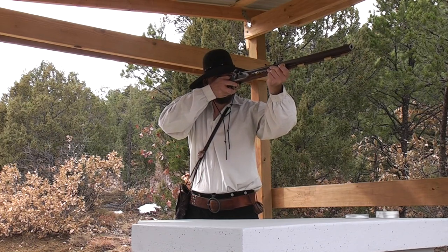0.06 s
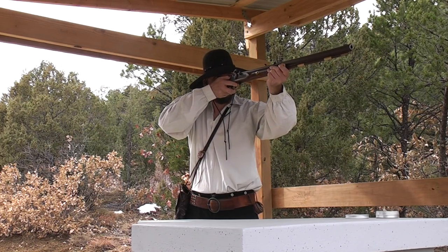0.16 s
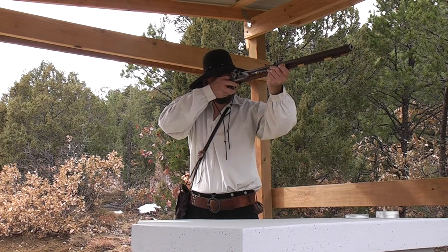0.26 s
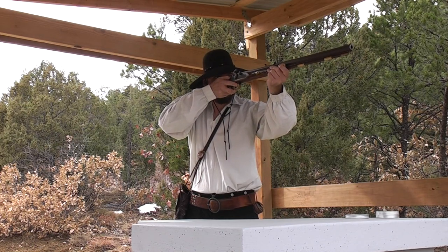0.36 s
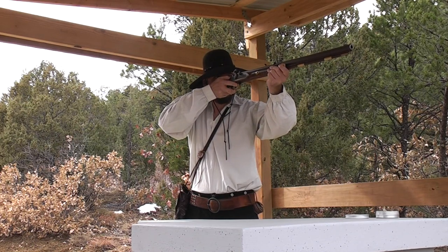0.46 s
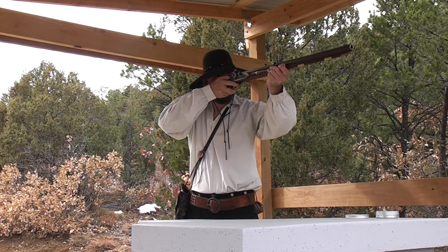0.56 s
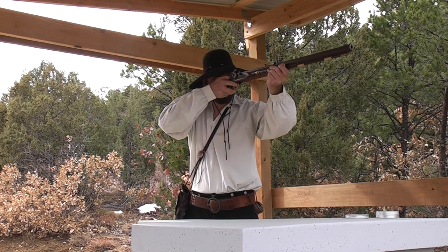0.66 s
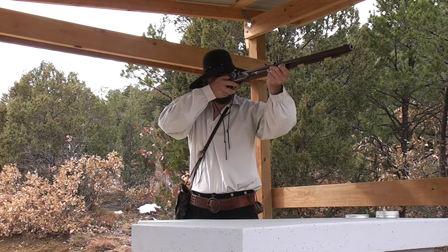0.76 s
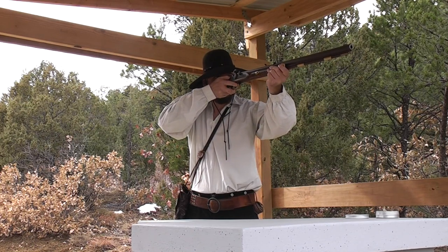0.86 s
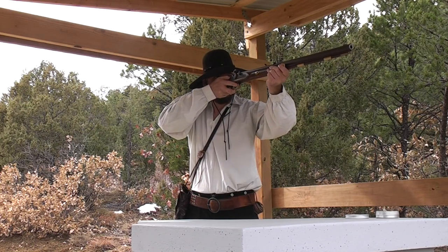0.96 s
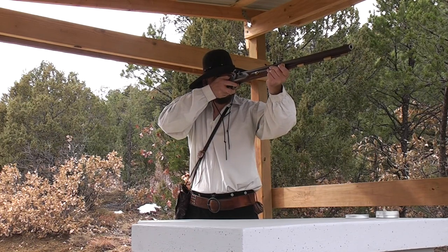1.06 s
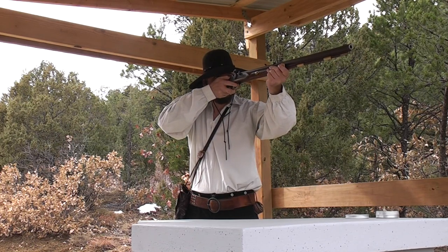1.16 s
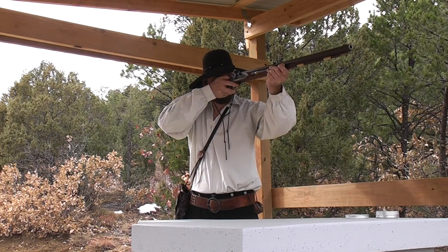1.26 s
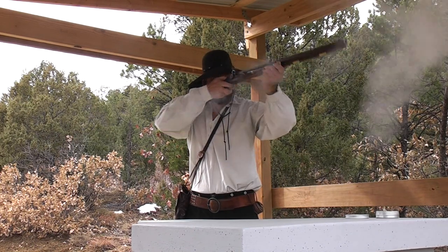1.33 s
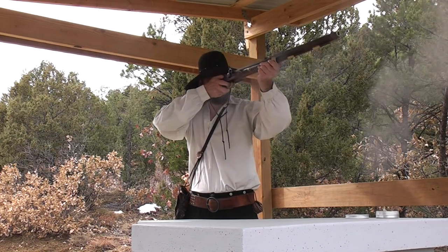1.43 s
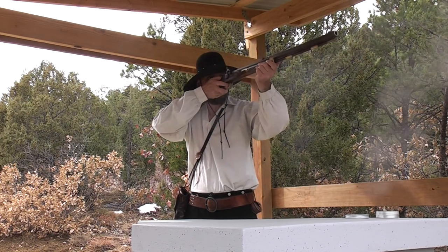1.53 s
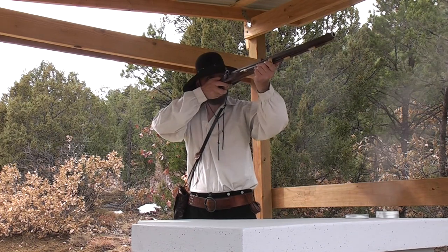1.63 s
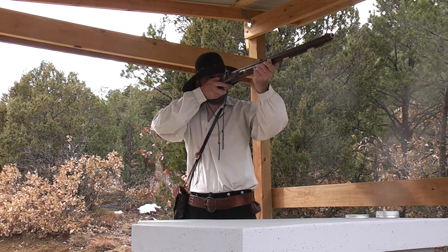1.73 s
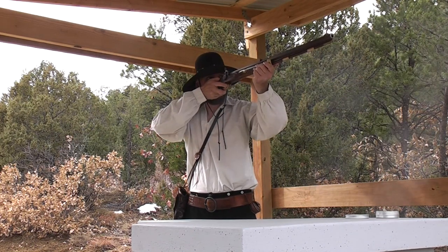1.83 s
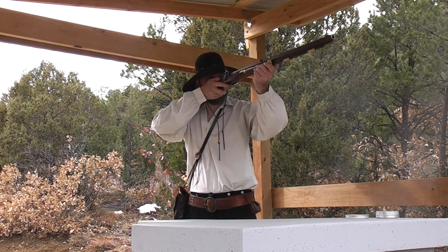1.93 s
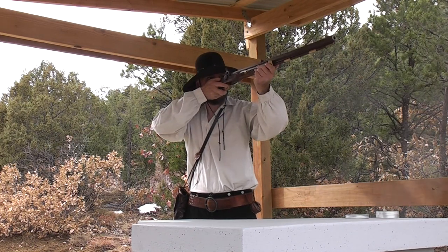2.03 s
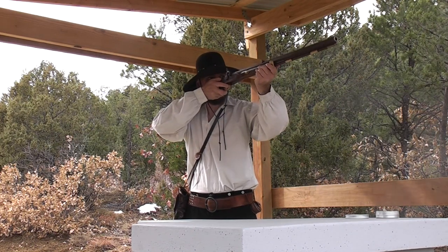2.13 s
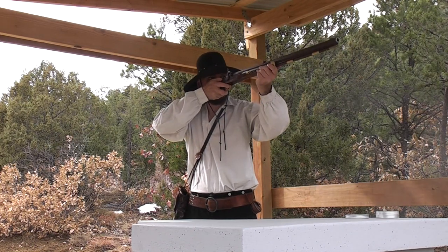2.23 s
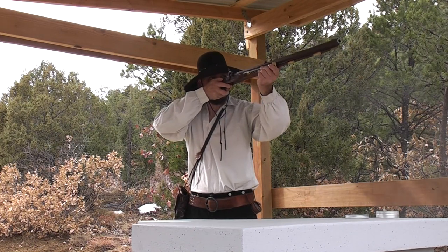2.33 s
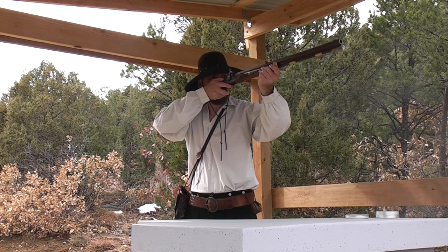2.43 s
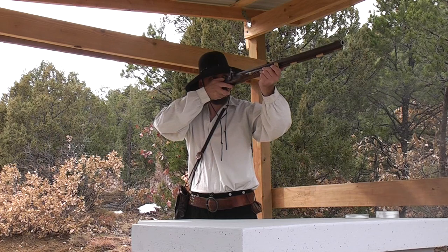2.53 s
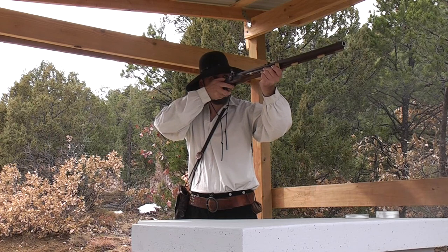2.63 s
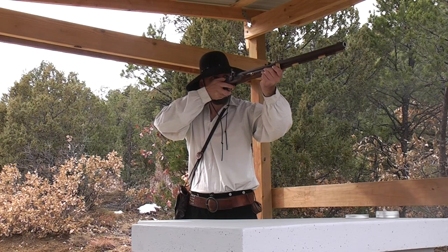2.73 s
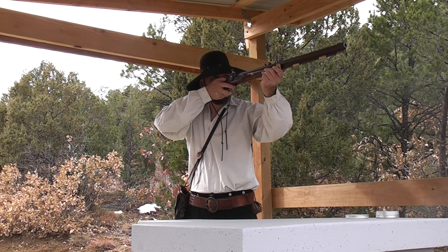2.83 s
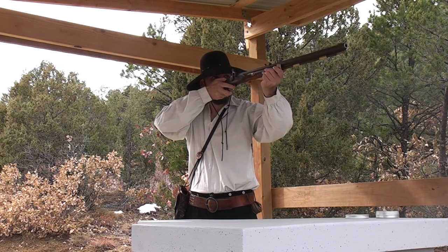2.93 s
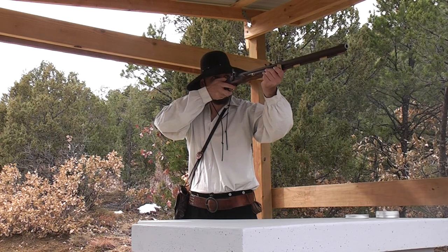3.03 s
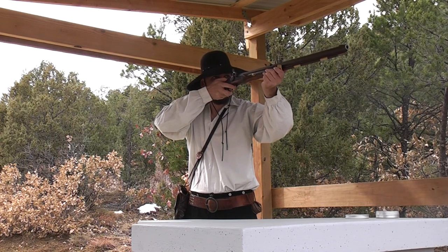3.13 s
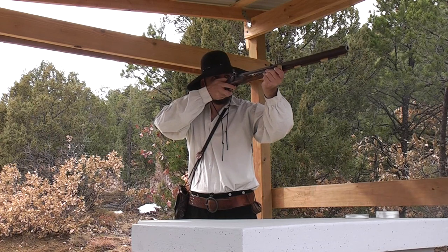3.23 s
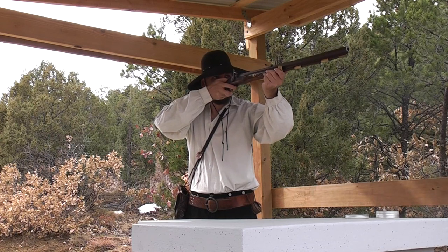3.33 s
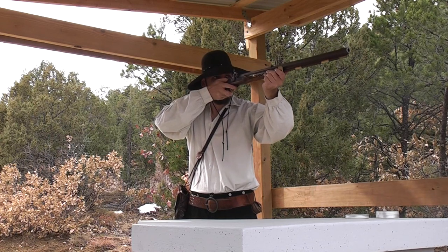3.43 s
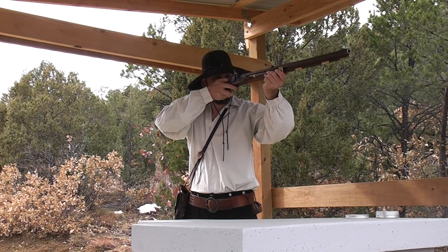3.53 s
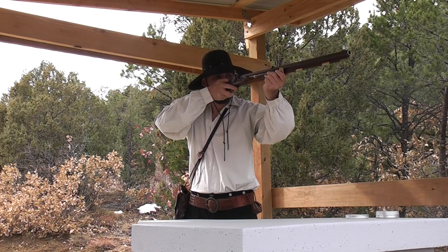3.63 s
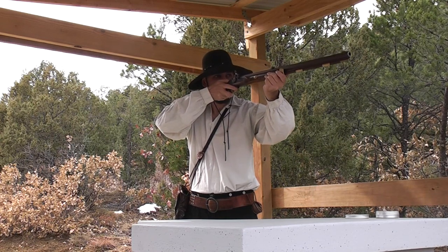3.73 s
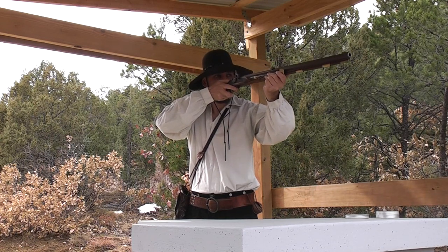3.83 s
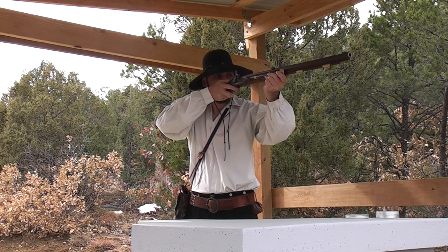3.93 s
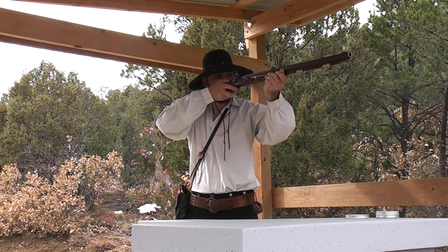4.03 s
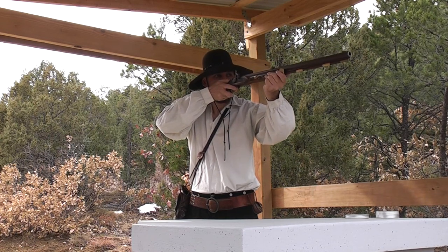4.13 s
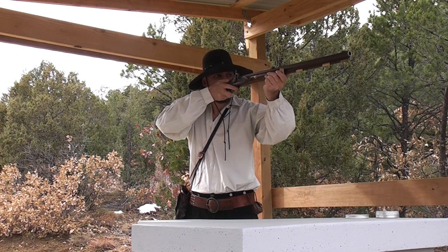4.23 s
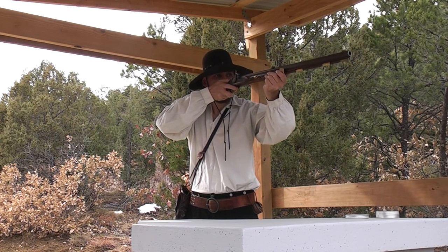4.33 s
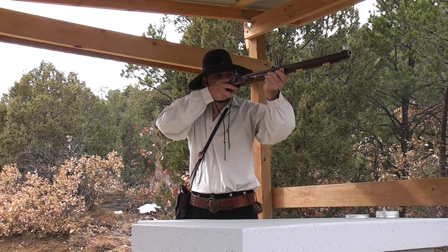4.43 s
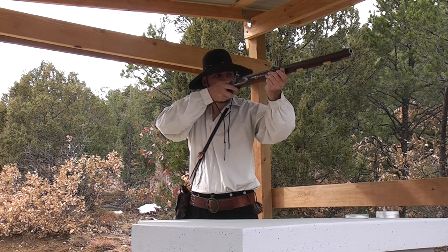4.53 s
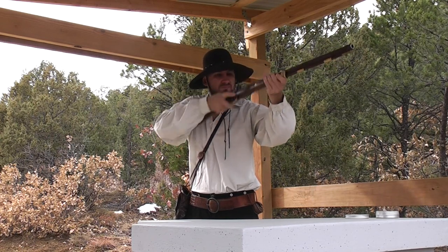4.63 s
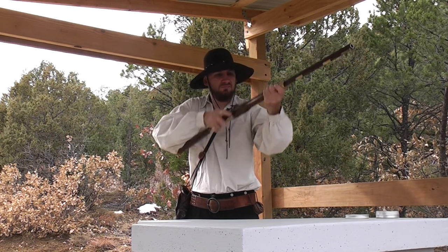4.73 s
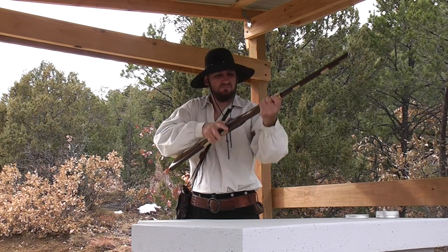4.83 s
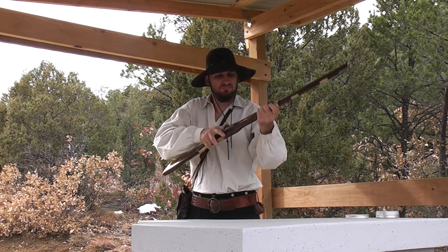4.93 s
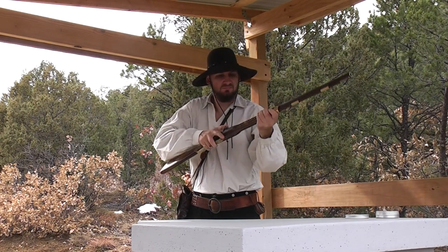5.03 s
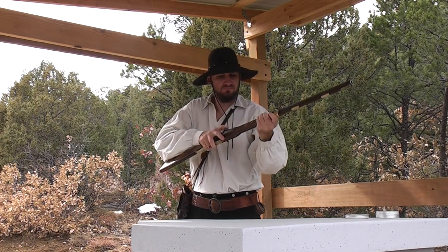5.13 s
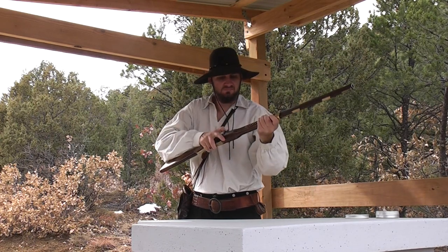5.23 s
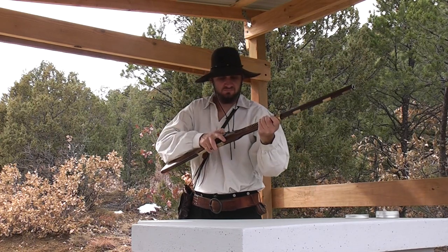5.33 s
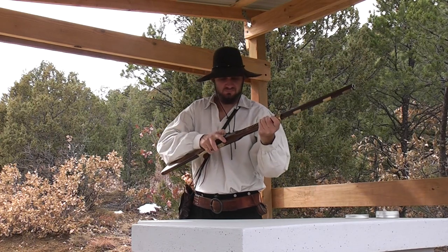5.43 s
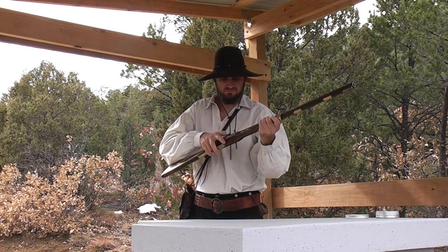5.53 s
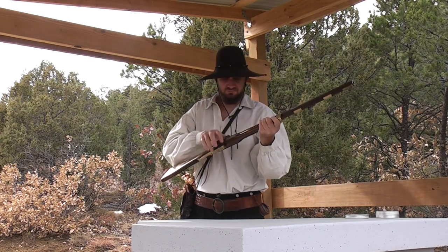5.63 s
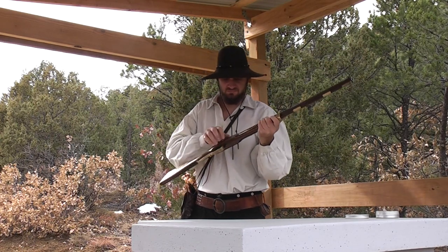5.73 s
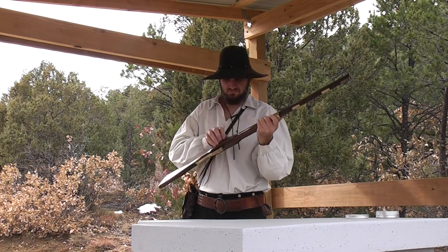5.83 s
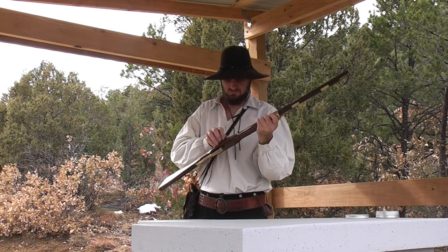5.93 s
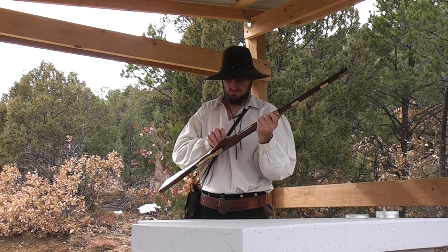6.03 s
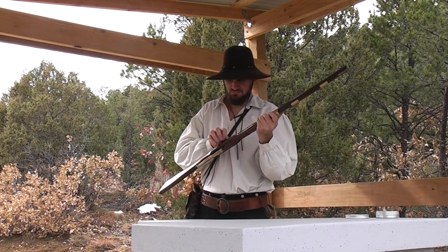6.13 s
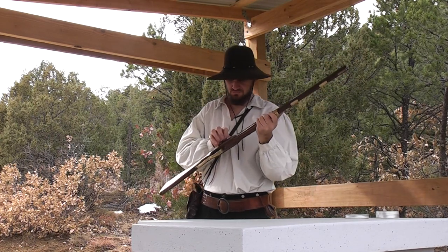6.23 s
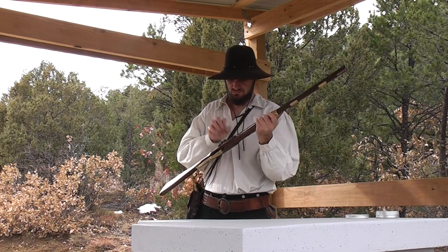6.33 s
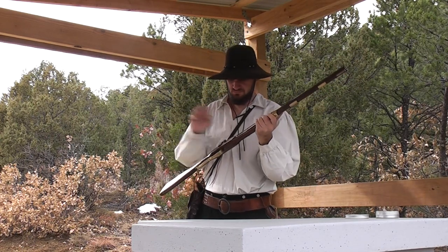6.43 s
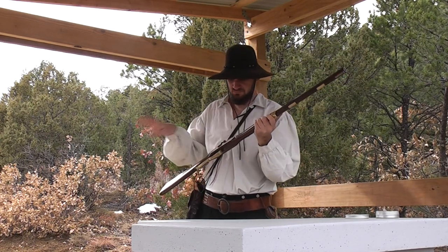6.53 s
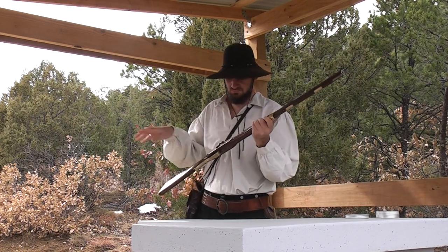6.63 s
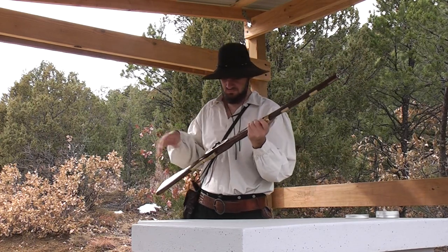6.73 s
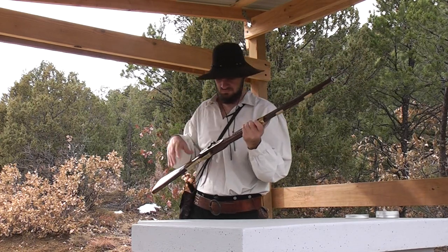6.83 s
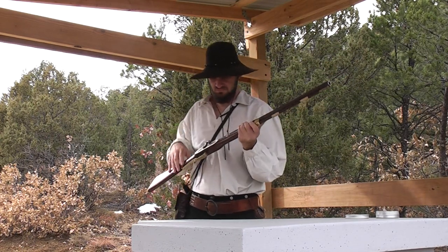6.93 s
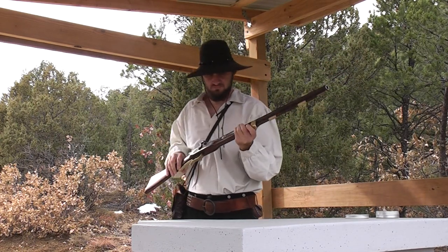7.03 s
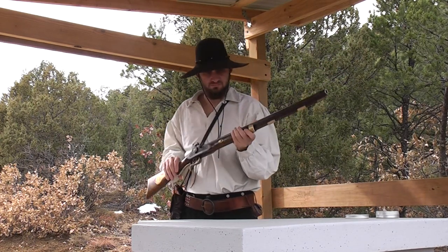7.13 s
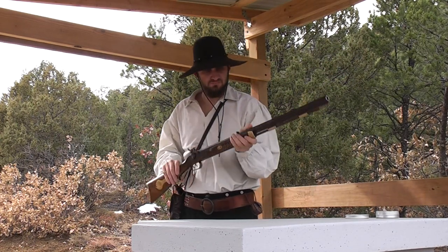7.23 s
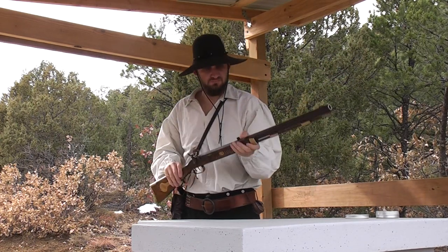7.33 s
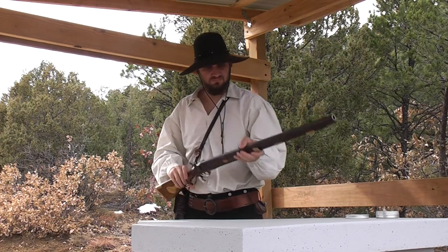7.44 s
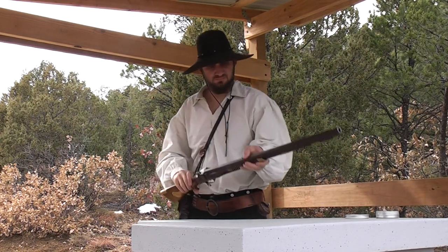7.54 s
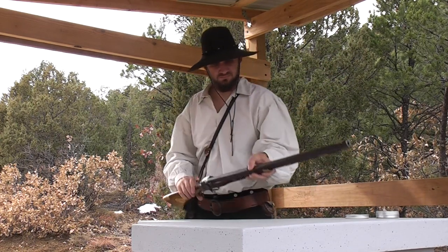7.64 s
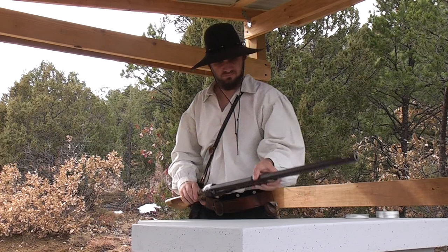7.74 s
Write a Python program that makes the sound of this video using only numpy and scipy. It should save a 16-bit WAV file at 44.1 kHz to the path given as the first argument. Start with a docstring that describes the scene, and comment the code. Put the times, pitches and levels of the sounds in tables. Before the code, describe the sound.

A black powder rifle cracks and booms under a timber shelter, echoes rolling off wooded hills, then sharp lock clicks and handling rubs.

```python
"""Hiss and a faint camera purr, soft pats on a gunstock, then a black powder rifle fired under a timber shelter.
The cap cracks, the blast (shaped noise) overloads the microphone, the air under the roof booms (dying sines).
Trees and hills return the shot ever duller: hard echoes over a wash of scattered noise.
Then the lock is cocked and the gun shifted in the hands: short noise scrapes and rubs that ring steel and wood."""
import sys
import numpy as np
from scipy import signal
from scipy.fft import rfft, irfft
from scipy.io import wavfile
from scipy.ndimage import uniform_filter1d

SR = 44100
rng = np.random.default_rng(int(sys.argv[2]) if len(sys.argv) > 2 else 0)


def bounce(signal):
    """Save signal as a 16-bit WAV file at the path given by the first command-line argument."""
    frames = np.transpose(np.atleast_2d(signal))
    limited = np.clip(frames, -1, 1)
    pcm = np.round(limited * 32767).astype(np.int16)
    wavfile.write(sys.argv[1], SR, pcm)


N = 342827
T = np.arange(N) / SR

CAP_S, BLAST_S, BOOM_S = 1.3977, 1.4057, 1.44  # onsets


def amp(db):
    """Decibels to gain."""
    return 10 ** (np.asarray(db) / 20)


def unit(x):
    """Scales to rms 1."""
    return x / np.sqrt(np.mean(x ** 2) + 1e-20)


def read(points, hz):
    """Interpolates a (Hz, value) table on a log-frequency axis."""
    f, value = np.transpose(points)
    return np.interp(np.log(hz + 1), np.log(f + 1), value)


def add(mix, start_s, sound):
    """Mixes a sound in at start_s, cut at the end of the mix."""
    part = mix[..., round(start_s * SR):][..., :sound.shape[-1]]
    part += sound[..., :part.shape[-1]]


def bins(size=4096):
    """Frequencies in Hz at which colours are given."""
    return np.fft.rfftfreq(size, 1 / SR)


def colour(x, db):
    """Minimum-phase filter of unit energy; db sets the shape of its response, one value per bin."""
    log_gain = np.log(amp(np.maximum(db - db.max(), -100)))
    mirrored = np.r_[log_gain, log_gain[-2:0:-1]]
    response = np.exp(np.conj(signal.hilbert(mirrored)))
    taps = np.fft.ifft(response).real[:len(db)]
    return signal.oaconvolve(x, taps / np.linalg.norm(taps))[:len(x)]


def spread(mid, side):
    """Left and right from mid and side."""
    return np.array([mid + side, mid - side])


def ring(modes, size=12000):
    """Dying sines of a resonance; modes are (Hz, dB, t60 in s)."""
    t = T[:size]
    return sum(amp(db - 60 * t / t60_s) * np.sin(2 * np.pi * hz * t) for hz, db, t60_s in modes)


def hump(centre_hz, steep_db):
    """A broad peak in dB that falls with the square of the distance in octaves."""
    return -steep_db * np.log2((bins() + 1) / centre_hz) ** 2


def shelter(x, wet_db, t60_s, size=10000):
    """Dense reflections from roof, posts and bench, a little different left and right."""
    t = T[:size]
    onset = np.clip((t - 0.002) / 0.0016, 0, 1)
    taps = rng.standard_normal((2, size)) * amp(-60 * t / t60_s) * onset
    taps = spread(taps[0], 0.5 * taps[1]) / np.linalg.norm(taps[0])
    return x + amp(wet_db) * signal.oaconvolve(x[None], taps, axes=1)[:, :N]


def background(floor_db=-62.5, purr_db=-50.5, turn_hz=29.42, size=1400):
    """Still air and microphone hiss; the camera's motor gives a soft knock of uneven strength at each turn."""
    # Spectrum of the hiss. Each row: frequency in Hz, level in dB.
    floor_spectrum = [(15, -66), (25, -38), (48, -11.5), (85, -20.5), (119, -10.5), (237, -8.5), (293, -13),
                      (372, -15.5), (436, -18.5), (554, -26.5), (991, -21.5), (1290, -22.5), (1470, -27.5),
                      (1920, -27), (14000, -41)]
    # Width of the hiss. Each row: frequency in Hz, side-to-mid ratio in dB.
    floor_width = [(60, -10), (130, -7.5), (290, -3.5), (640, 7), (1410, 6), (3100, 5.5), (6820, 0),
                   (15000, -9.5)]
    hz = np.fft.rfftfreq(N, 1 / SR)
    top_cut = 1 + (hz / 14000) ** 16
    mid, side = rfft(rng.standard_normal((2, N))) * amp(read(floor_spectrum, hz)) / top_cut
    mid, side = irfft(mid, N), irfft(side * amp(read(floor_width, hz)), N)
    hiss = amp(floor_db) * spread(mid, side) / mid.std()
    turns = np.diff(np.floor(T * turn_hz), prepend=0) * amp(0.86 * rng.standard_normal(N))
    knock = ring([(222, 0.5, 0.027), (140, -12.5, 0.01)])[:size]
    return hiss + amp(purr_db) * signal.oaconvolve(turns, knock)[:N]


def hands(ring_db=-39, jingle_db=-56, size=8000):
    """Grainy rubs and pats stir the modes of the wooden stock; a small metal fitting jingles."""
    # Palms and sleeves on the stock. Each row: start in seconds, level in dB, fade in seconds,
    # brightest frequency in Hz, fall off that peak in dB per square octave.
    touches = [(1.135, -48.5, 0.0027, 168, 9), (1.133, -63, 0.0058, 1230, 24), (1.168, -62, 0.0029, 180, 8),
               (3.376, -49.5, 0.0052, 162, 7), (4.637, -61.5, 0.0056, 3010, 6),
               (4.699, -61, 0.0084, 3180, 3), (6.622, -60.5, 0.011, 2500, 7),
               (6.649, -57, 0.008, 1880, 8.5), (6.898, -39, 0.0055, 1210, 7.5),
               (6.906, -46.5, 0.012, 3100, 8), (6.98, -54.5, 0.0062, 3040, 14),
               (7.091, -67, 0.017, 4970, 11), (7.125, -61, 0.01, 2060, 12), (7.183, -59.5, 0.01, 3280, 3),
               (7.513, -54, 0.01, 1390, 2.7), (7.542, -51.5, 0.0085, 1470, 2.7),
               (7.563, -53.5, 0.0084, 2800, 13), (7.592, -53, 0.0075, 3400, 11),
               (7.652, -62, 0.0068, 3540, 7)]
    # Modes of the wooden stock. Each row: frequency in Hz, level in dB, t60 in seconds.
    stock_modes = [(690, -11, 0.07), (1000, 3, 0.02), (1160, -16, 0.033), (1450, -1.5, 0.083),
                   (1730, 3.5, 0.022), (2780, -11, 0.09)]
    # Modes of the metal fitting. Each row: frequency in Hz, level in dB, t60 in seconds.
    jingle_modes = [(7600, -9, 0.17), (7900, 0, 0.14), (8250, -6.5, 0.15)]
    # Strikes of the metal fitting: start in seconds.
    jingle_starts = [7.127, 7.144]
    t, out = T[:size], np.zeros(N)
    for start_s, db, fade_s, hz, steep_db in touches:
        unevenness = amp(1.6 * np.minimum(rng.exponential(1, size), 4))
        grains = unit(rng.standard_normal(size) * unevenness)
        swell = t / fade_s * np.exp(1 - t / fade_s)
        rub = colour(grains * swell, hump(hz, steep_db))
        wood = signal.oaconvolve(rub, ring(stock_modes))[:size]
        add(out, start_s, amp(db) * (rub + amp(ring_db) * wood))
    for start_s in jingle_starts:
        add(out, start_s, amp(jingle_db) * ring(jingle_modes))
    return shelter(out, wet_db=-4.5, t60_s=0.16)


def lock(ring_db=-42, rise_s=0.00029, low_cut_hz=750, size=8000):
    """The sear scrapes and drops into its notch; the steel of lock and barrel rings briefly."""
    # Steel parts of the lock. Each row: start in seconds, level in dB, scrape length in seconds,
    # brightest frequency in Hz, fall off that peak in dB per square octave, share reaching the body (0-1).
    clicks = [(2.474, -60, 0.0064, 7000, 7, .5), (5.4374, -23, 0.0076, 5400, -0.14, 1),
              (5.4415, -26, 0.0033, 5050, 1, .8), (5.536, -55.5, 0.0092, 4440, 8, 0.7),
              (5.666, -48, 0.0015, 5200, 6, .25), (5.669, -46, 0.0041, 6500, 13, 0.7),
              (5.672, -55.5, 0.025, 6550, 34, 0.04), (6.086, -59, 0.0084, 4460, 8, 0.57)]
    # Colour of the steel body. Each row: frequency in Hz, level in dB.
    body_colour = [(500, -54), (1000, -19.5), (1280, 1.5), (1600, -6), (1900, 3), (2230, -10), (2500, -2),
                   (3050, -6.5), (3400, 7), (3800, -4.5), (4600, 1.5), (5100, -5), (5560, 6.5), (6200, -2),
                   (8800, -6.5), (10800, -6.5), (12300, -14), (15000, -22)]
    # Modes of lock and barrel. Each row: frequency in Hz, level in dB, t60 in seconds.
    steel_modes = [(1253, 4.5, 0.09), (1370, -2, 0.06), (3370, 5, 0.085), (4710, -3, .08), (5500, -8, .13),
                   (7350, -14, 0.11), (9650, -8, 0.08), (10900, -4, 0.077)]
    t, out = T[:size], np.zeros(N)
    for start_s, db, length_s, hz, steep_db, body in clicks:
        envelope = (1 - np.exp(-t / rise_s)) * np.exp(-(t / length_s) ** 3)
        scrape = rng.standard_normal(size) * envelope
        steel = signal.oaconvolve(scrape, ring(steel_modes))[:size]
        click = colour(scrape, body * read(body_colour, bins())) + body * amp(ring_db) * steel
        click = colour(click, hump(hz, steep_db))
        add(out, start_s, amp(db) * np.sqrt(length_s * SR) * click / np.linalg.norm(click))
    # small parts radiate little bass
    out = signal.sosfilt(signal.butter(2, low_cut_hz, "high", fs=SR, output="sos"), out)
    return shelter(out, wet_db=-9.5, t60_s=0.13)


def travelled(hz, arrival_s, near_s=1.575, air_share=0.64, woods_s=1.925, woods_depth_s=0.63, woods_onset_s=0.41):
    """Colour in dB of an echo: air and foliage eat the treble on the way, the more so the later it arrives."""
    # Colour of echoes arriving at near_s. Each row: frequency in Hz, level in dB.
    near_colour = [(30, -62.5), (50, -37.5), (75, -18), (177, -9.5), (370, -17), (540, -8), (800, -1),
                   (1200, -0.4), (1900, -5.5), (2500, -7), (3360, -11), (7960, -24.5), (12600, -41),
                   (15000, -54)]
    # Loss on the way. Each row: frequency in Hz, loss relative to the middle band in dB per
    # second of travel; air_share scales it on open paths.
    path_loss = [(60, -2), (200, 4), (450, -1.5), (800, 1), (1300, 5.5), (2000, 14), (3200, 22.5),
                 (5000, 34), (8000, 52.5), (13000, 59.5)]
    # echoes after woods_s also cross dense trees, worth up to woods_depth_s of extra unscaled travel
    woods = woods_depth_s * (1 - np.exp(-np.maximum(arrival_s - woods_s, 0) / woods_onset_s))
    return read(near_colour, hz) - read(path_loss, hz) * (air_share * (arrival_s - near_s) + woods)


def returned():
    """Each stretch of land swells in, holds while the shock front sweeps it and dies away; powers add."""
    # Land from the nearest trees to the farthest ridge. Each row: arrival in seconds, hold in seconds,
    # level in dB, rise in seconds, t60 in seconds.
    stretches = [(1.519, 0.07, -25, 0.039, 2.9), (1.678, 0.16, -23.5, 0.095, 0.022),
                 (1.88, 0.019, -21.5, 0.02, 0.038), (1.913, 0.072, -25, 0.057, 2.17),
                 (2.325, 0.042, -28, 0.26, 2.35), (3.701, 0.32, -51.5, 0.82, 7.6),
                 (5.901, 0.61, -61.5, 1, 3.04)]
    power = np.zeros(N)
    for arrival_s, hold_s, db, rise_s, t60_s in stretches:
        early_s = np.maximum(arrival_s - T, 0)
        late_s = np.maximum(T - arrival_s - hold_s, 0)
        power += (np.exp(-(early_s / rise_s) ** 2) * amp(db - 60 * late_s / t60_s)) ** 2
    return np.sqrt(power) * (T > BLAST_S)


def scatter(grain_db, smooth_s, per_s=7000):
    """Countless small reflections of uneven size, which merge as they come from further away."""
    unevenness = amp(grain_db * np.minimum(rng.exponential(1, N), 3))
    sparse = unit(rng.standard_normal(N) * unevenness * (rng.random(N) < per_s / SR))
    share = np.exp(-np.maximum(T - BLAST_S, 0) / smooth_s)
    return np.sqrt(share) * sparse + np.sqrt(1 - share) * rng.standard_normal(N)


def roll(flutter_db=0.73, size=2048):
    """The wooded slopes return the shot for seconds: scattered noise, coloured by its travel time."""
    # Width of the echoes. Each row: frequency in Hz, side-to-mid ratio in dB.
    echo_width = [(150, -23), (500, -13.5), (900, -7.5), (1600, -4.5), (6000, -8), (12000, -3)]
    # Lean of the early echoes. Each row: frequency in Hz, left-to-right ratio in dB.
    echo_lean = [(300, 0.5), (800, 1.5), (1800, -3), (6000, -2.5), (12000, -0.5)]
    sources = np.array([scatter(grain_db=3.5, smooth_s=2.4), scatter(grain_db=-4.0, smooth_s=1.0)])
    hz, frame_s, z = signal.stft(sources, SR, nperseg=size, noverlap=size * 3 // 4)
    hz = hz[:, None]
    gain = amp(travelled(hz, np.maximum(frame_s, BLAST_S)))
    middle_band = (hz > 500) & (hz < 1600)
    gain /= np.sqrt(np.mean(gain ** 2 * middle_band, axis=0))
    # late echoes come from all round
    lean = amp(read(echo_lean, hz) / 2 * np.exp(-np.maximum(frame_s - 2.2, 0)))
    z = spread(z[0], z[1] * amp(read(echo_width, hz))) * gain * np.array([lean, 1 / lean])
    wash = signal.istft(z, nperseg=size, noverlap=size * 3 // 4)[1][:, :N]
    flutter = uniform_filter1d(rng.standard_normal(N), size=700)
    flutter = unit(uniform_filter1d(flutter, size=300))
    return wash * returned() * amp(flutter_db * flutter)


def slaps(scatter_db=-10.0, blur=0.25, trail_s=0.0014, trail_growth_per_s=0.012, size=3000):
    """Broad surfaces return the shock front almost whole; from afar its trail is longer and softer in onset."""
    # Single hard echoes from trunks and banks. Each row: time in seconds, peak in dB,
    # left-to-right ratio in dB.
    hard_echoes = [(1.489, -12, 0), (1.523, -7, 0.5), (1.554, -7.5, -1), (1.605, -9.5, 7),
                   (1.634, -9.5, -9), (1.644, -14, -5.5), (1.693, -12, -3), (1.712, -8.5, -2.5),
                   (1.725, -13, 0), (1.756, -9.5, 3.5), (1.792, -11.5, -5), (1.811, -15, -1.5),
                   (1.826, -11.5, -4.5), (1.875, -13, -2), (1.901, -9, -5), (2.021, -18.5, 0),
                   (2.074, -18, 0.5), (2.281, -21, 0), (2.335, -19.5, 0), (2.418, -15, -0.5),
                   (2.484, -28.5, -1), (2.613, -30, 0)]
    t, out = T[:size], np.zeros((2, N))
    for arrival_s, db, pan_db in hard_echoes:
        smear_s = trail_growth_per_s * (arrival_s - BLAST_S) ** 2
        envelope = np.exp(-t / (trail_s + smear_s)) * (1 - np.exp(-t / (blur * smear_s)))
        trail = rng.standard_normal(size) * envelope
        front = signal.unit_impulse(size) + amp(scatter_db) * trail
        crack = colour(front, travelled(bins(), arrival_s))
        gain = amp(db + np.array([[pan_db], [-pan_db]]) / 2)
        add(out, arrival_s + 0.001493, gain * crack / abs(crack).max())  # all start 1.493 ms after the table
    return out


def shot(cap_db=-17, blast_db=-13.5, front_db=-4, push_db=-25, boom_db=1, hold_s=0.044, fall_db_per_s=300,
         size=16000):
    """The cap's crack, then the shock front, its clatter round the shelter and a boom under the roof."""
    # Spectrum of the cap, also of the shock front. Each row: frequency in Hz, level in dB.
    cap_spectrum = [(180, -68), (300, -46), (928, -12.5), (3170, -6.5), (3920, -9), (4620, -7),
                    (6400, -4.5), (15000, -25)]
    # Spectrum of the clatter. Each row: frequency in Hz, level in dB.
    blast_spectrum = [(24, -49.5), (40, -15), (235, -5.5), (387, -11), (926, -3), (1410, -4.5),
                      (1960, -7.5), (2160, -4), (2920, -9), (4680, -11), (5170, -14), (8110, -16),
                      (15500, -35)]
    # Width of the clatter. Each row: frequency in Hz, side-to-mid ratio in dB.
    blast_width = [(60, 2.5), (500, 0.5), (1200, -4.5), (4000, -5), (12000, -5)]
    # Modes of the air under the roof. Each row: frequency in Hz, level in dB, t60 in seconds.
    roof_modes = [(218.6, -16, 0.23), (291, -1, 0.09), (151.76, -26, 0.22)]
    t, out = T[:size], np.zeros((2, N))

    def noise(spectrum):
        """Noise burst of the given spectrum."""
        return colour(rng.standard_normal(size), read(spectrum, bins()))

    cap = spread(noise(cap_spectrum), 0.4 * noise(cap_spectrum))
    add(out, CAP_S, amp(cap_db) * cap * np.minimum(t / 0.00044, 1) * np.exp(-t / 0.011))
    front = spread(noise(cap_spectrum), 0.33 * noise(cap_spectrum))
    add(out, BLAST_S, amp(front_db) * front * np.exp(-t / 0.00089))
    side = irfft(rfft(noise(blast_spectrum)) * amp(read(blast_width, bins(size))), size)
    clatter = spread(noise(blast_spectrum), side)
    add(out, BLAST_S, clatter * amp(blast_db - fall_db_per_s * np.maximum(t - hold_s, 0)))
    u = t / 0.0049  # the muzzle gas pushes, then sucks back
    add(out, BLAST_S, amp(push_db) * (1 - u) * np.exp(-u))
    boom = ring(roof_modes, size=size) * (1 - np.exp(-t / 0.013))  # builds up over a few cycles
    late_boom = 0.5 * np.roll(boom, round(0.0012 * SR))
    add(out, BOOM_S, amp(boom_db) * np.array([boom, late_boom]))
    return out


def scene():
    """The background, the handling, the echoes and the shot."""
    return background() + hands() + lock() + roll() + slaps() + shot()


def record(dry, ceiling=1.0, low_cut_hz=48, edge_hz=15800):
    """The microphone overloads softly on the blast; then the recorder's band limits."""
    flattened = ceiling * np.tanh(dry / ceiling)
    thinned = signal.sosfilt(signal.butter(4, low_cut_hz, "high", fs=SR, output="sos"), flattened)
    low_pass = signal.firwin(301, edge_hz, window=("kaiser", 9), fs=SR)
    return signal.oaconvolve(thinned, low_pass[None], "same")


dry = scene()
out = record(dry)
bounce(out)
```